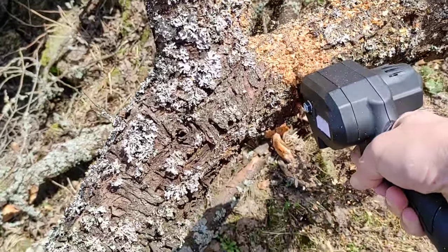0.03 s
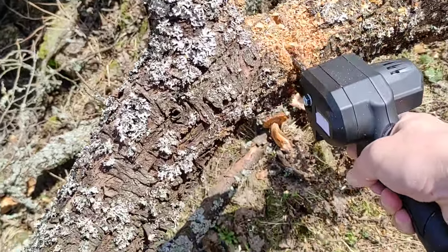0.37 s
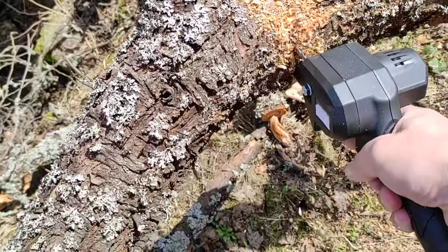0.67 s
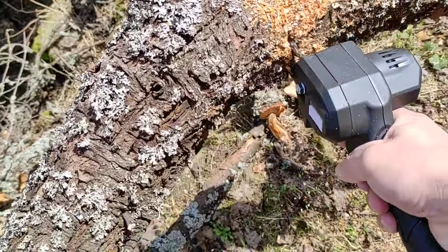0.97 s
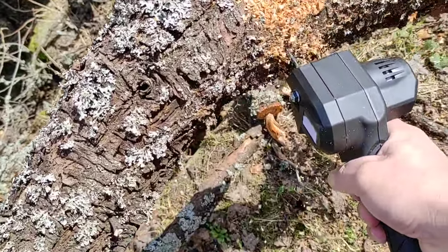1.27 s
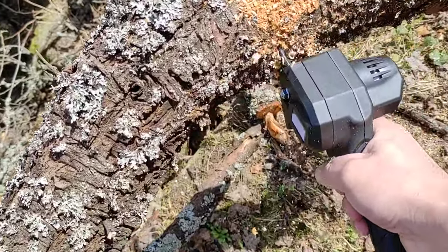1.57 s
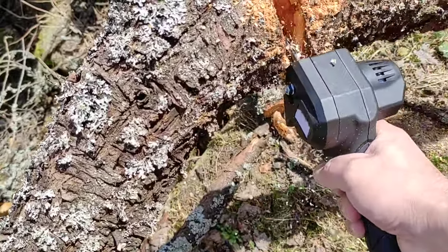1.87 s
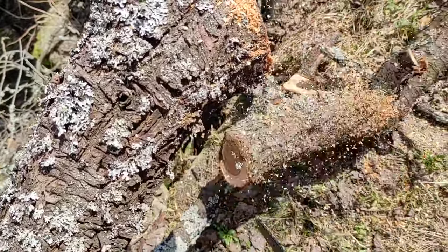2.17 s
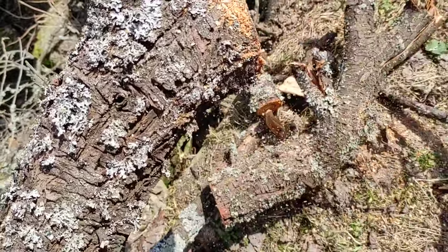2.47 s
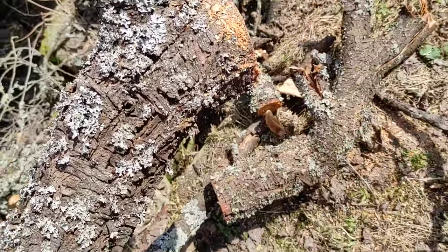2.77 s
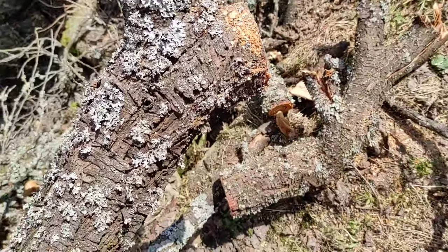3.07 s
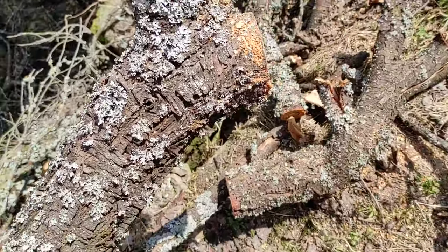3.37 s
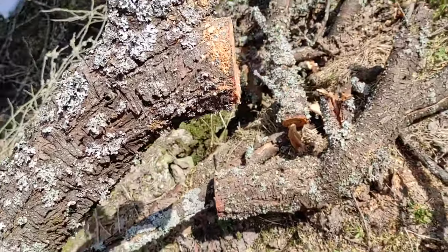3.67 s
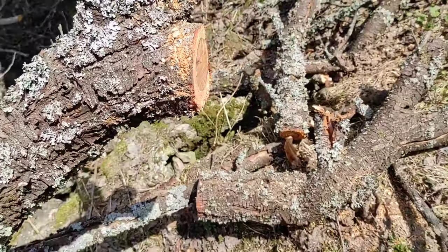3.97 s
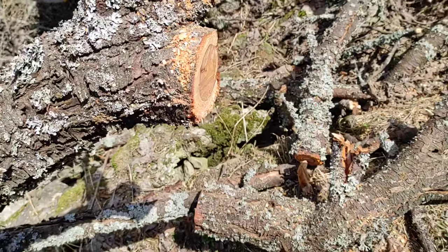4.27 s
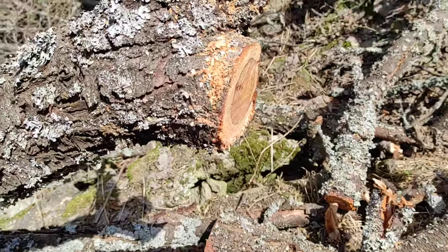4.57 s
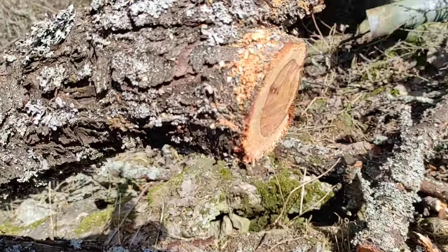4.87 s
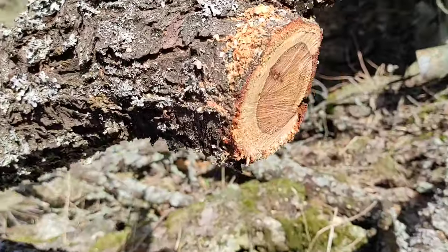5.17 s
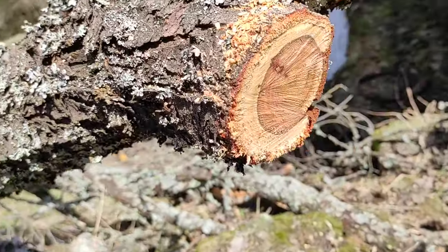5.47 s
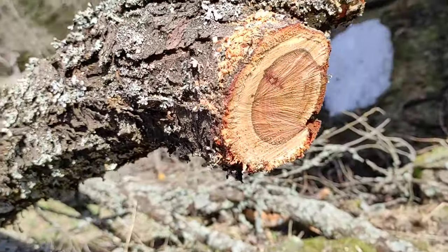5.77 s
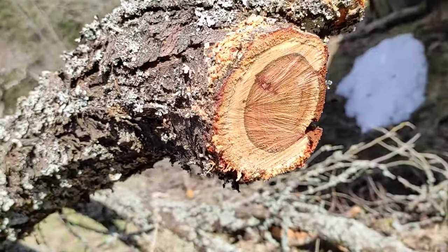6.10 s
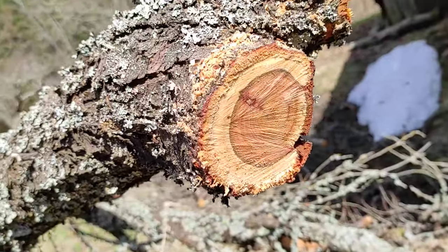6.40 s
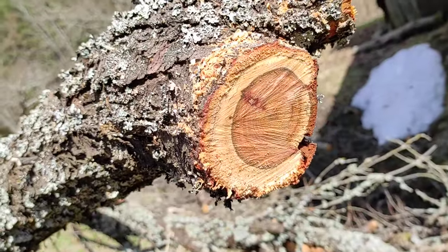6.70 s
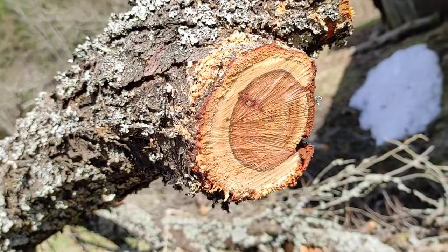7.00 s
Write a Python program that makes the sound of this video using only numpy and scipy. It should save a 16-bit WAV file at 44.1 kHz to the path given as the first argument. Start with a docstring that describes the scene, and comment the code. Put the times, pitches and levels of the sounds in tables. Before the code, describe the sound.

Close by outdoors, a small battery chainsaw rasps through a dry branch, its chain clattering and humming as the bar judders. After about two seconds it breaks through, races briefly and brakes to a stop. The branch lands with a dull thump. The rest is much quieter: feet shift in crackling dry grass, small twigs snap, and gusts of wind rumble and flutter on the microphone.

```python
"""Chainsaw through a dry branch

A small battery chainsaw rasps through dry wood outdoors: cutters tear fibres, links clatter and hum,
and the bar judders in the kerf. The chain races as it breaks free, then brakes to a stop.
The branch thumps into the litter; feet shift in crackling grass, twigs snap,
and gusts rumble and flutter on the microphone."""
import sys
import numpy as np
from scipy import signal
from scipy.fft import rfft, irfft, next_fast_len
from scipy.io import wavfile

SR = 44100
rng = np.random.default_rng(int(sys.argv[2]) if len(sys.argv) > 2 else 0)


def unload_wav(signal):
    """Save mono or channel-first audio to the path in sys.argv[1] as 16-bit WAV at rate SR, clipped to [-1, 1]."""
    wavfile.write(
        sys.argv[1],
        SR,
        np.round(np.clip(np.atleast_2d(signal).T, -1, 1) * 32767).astype(np.int16),
    )


N = 319284
T = np.arange(N) / SR

# chain speed in the wood: (time [s], speed [links/s])
CUTTING_SPEED = [(0, 322), (.3, 336), (.52, 334), (.72, 322), (.95, 316), (1.1, 333), (1.25, 338),
                 (1.35, 360), (1.55, 365), (1.88, 335)]
# effort of the cut: (time [s], clatter level [dB], motor load [0-1])
CUT_EFFORT = [(0, -18.5, 0.7), (.2, -19, 0.99), (.4, -21.5, 0.96), (.7, -18.5, 1), (.97, -21, 0.52),
              (1.15, -19.5, 0.4), (1.6, -18.5, 0.4), (2.0, -17.5, .7), (2.2, -19.5, 0.7),
              (2.275, -18, 0.74)]
# the bar bouncing in the kerf: (time [s], rate [bounces/s], depth [0-1])
BAR_JUDDER = [(0, 29, .6), (.3, 31, .55), (.55, 31, .55), (.7, 48, .45), (.85, 50, .6), (1.0, 41, .7),
              (1.15, 35, .7), (1.6, 34.6, .9), (1.95, 33, .6), (2.1, 35, .3)]
# cutters catching hard: (time [s], level [dB], pitch [Hz])
CUTTER_CATCHES = [(.06, -22, 820), (.1, -25.5, 810), (.139, -23, 795), (0.208, -23, 860),
                  (.241, -22.5, 870), (.264, -22.5, 840), (.394, -28.5, 956), (.479, -24, 840),
                  (.516, -21.5, 870), (.646, -20.5, 868), (.727, -19, 860), (.826, -21.5, 930),
                  (.886, -25, 926), (.908, -21, 956), (.954, -24.5, 980), (1.03, -22.5, 980),
                  (1.085, -27, 336), (1.159, -23, 885), (1.184, -23.5, 704), (1.239, -18.5, 960),
                  (1.306, -25.5, 1010), (1.362, -26.5, 354), (1.415, -22, 1080), (1.452, -24, 820),
                  (1.504, -24.5, 783), (1.558, -28.5, 1045), (1.619, -28.5, 770), (1.654, -21, 789),
                  (1.749, -18, 940), (1.769, -23, 830), (1.79, -22, 780), (1.861, -19.5, 1090),
                  (1.89, -23, 777), (1.894, -24, 450)]
# the wood singing around the kerf: (time [s], pitch [Hz], level [dB])
KERF_RESONANCE = [(0, 765, -35.5), (.07, 780, -28), (.16, 854, -32), (.26, 890, -33.5), (.38, 950, -48.5),
                  (.53, 837, -31), (.72, 785, -33), (.82, 885, -36.5), (.91, 924, -29.5), (1.05, 975, -36),
                  (1.15, 960, -45), (2.0, 870, -40)]
# the nearly severed branch shaking: (start [s], hold [s], level [dB])
BRANCH_SHAKES = [(1.697, .04, -36), (1.862, 0.051, -32.5)]
# modes of the branch and of the steel bar: (frequency [Hz], level [dB], t60 [s])
BRANCH_MODES = [(360, -7, 0.024), (553, -9, 0.012), (717, -6, 0.029), (854, -3, 0.031), (970, -1.5, 0.031),
                (1080, -3.5, 0.02), (1890, -13.5, 0.028)]
BAR_MODES = [(3780, -18, .014), (4150, -21, .03), (4590, -21, 0.014), (5040, -25, 0.025),
             (5830, -21, 0.018)]
# sprocket partials: (order [x link rate], free level [dB], loaded level [dB])
HUM_PARTIALS = [(.5, -26, -19.5), (1, -2, -10.5), (1.5, -25.5, -14), (2, 2, -9.5), (2.5, -27, -0.5),
                (3, -8.5, -2.5), (4, -3, -12), (5, -20, -18)]
# tone colours of the wood and the chain: (frequency [Hz], level [dB])
RASP_EQ = [(600, -32), (1000, -13), (1250, -7.5), (1610, -7), (1930, -0.5), (2280, -4), (2990, -6),
           (3780, -7), (4530, -10.5), (5000, -15), (5500, -8.5), (7150, -40), (12100, -120)]
CHEWING_EQ = [(150, -39.5), (250, -22), (328, -17), (388, -12.5), (557, -6.5), (843, -3.5), (1100, -4),
              (1500, -21), (2500, -32.5)]
SHUDDER_EQ = [(80, -18), (125, -11), (165, -1.5), (225, -7), (290, 2.5), (360, -4), (480, -1.5), (800, -33)]
CLATTER_EQ = [(2820, -40), (4600, -11.5), (5200, -14), (5860, -7), (6910, 3), (8180, 2.5), (9150, -3),
              (9640, -14), (9950, -14.5), (11000, -16.5), (15100, -22.5), (15800, -26.5)]
RACING_EQ = [(250, -29.5), (400, -12.5), (600, -8.5), (930, -2.5), (1300, -11.5), (1930, -3.5), (2800, -6),
             (4300, -9.5), (5500, -11), (7000, -35)]

# twigs breaking: (time [s], body [dB], crack [dB], knock pitch [Hz], crack pitch [Hz], pan [dB])
TWIG_SNAPS = [(2.361, -53, -33, 800, 7500, 2.5), (2.412, -37, -24, 2420, 7260, -3),
              (2.435, -47, -29, 2810, 7500, 3), (2.478, -49, -34, 2000, 7500, -7),
              (2.535, -46, -40, 826, 7400, -6), (2.94, -61, -49, 880, 7500, 4.5),
              (3.279, -51, -65, 520, 5940, 5), (3.331, -47, -66, 514, 6000, 2),
              (3.385, -46.5, -33.5, 2590, 7660, 5), (3.457, -47.5, -65, 565, 6000, 0),
              (3.524, -45, -60, 594, 6000, -1), (3.556, -44.5, -46, 1410, 4500, 3),
              (4.09, -58, -41, 760, 7700, 7), (4.227, -54, -41, 1900, 7500, 1),
              (4.309, -45, -50, 600, 7500, 2), (4.482, -43.5, -35, 2400, 8000, 7),
              (4.492, -48, -45, 520, 7500, 1), (4.535, -60, -41, 2200, 8200, 5),
              (4.549, -51, -30, 2080, 8850, 7), (4.568, -36, -29, 600, 7500, -1),
              (4.599, -43, -34, 2100, 8000, 6), (4.613, -45, -32, 2010, 6800, 3),
              (4.665, -33, -39, 980, 4500, -1), (4.683, -48, -34, 2000, 8000, 5),
              (4.715, -48, -32, 2200, 6000, 5), (4.728, -45, -34, 2400, 8000, 7),
              (4.746, -49, -33, 2200, 6800, 9), (4.77, -39.5, -36, 2200, 6500, 8),
              (4.788, -46, -36, 2760, 8000, 8), (4.835, -45, -28, 2200, 5240, 9),
              (4.906, -50, -30.5, 1790, 6400, 6), (5.072, -47, -36, 1300, 6300, 3),
              (5.171, -50, -53, 1220, 6000, 1), (5.299, -45.5, -56, 1090, 6000, 4),
              (5.405, -49, -56, 1000, 6000, 2), (5.474, -47, -50, 2400, 7500, 2),
              (5.481, -53, -47, 2000, 7500, 1.5), (5.512, -59, -38.5, 940, 7500, -3),
              (5.653, -51, -54, 1170, 6000, 4), (5.965, -41.5, -53, 1690, 5960, 1),
              (6.124, -48, -46.5, 1400, 7460, 4), (6.153, -35.5, -42, 1140, 4500, -1),
              (6.159, -58, -40.5, 790, 6960, -14), (6.181, -47, -55, 850, 5970, 2),
              (6.459, -57, -56, 980, 6000, -2.5), (6.503, -57.5, -63, 1500, 4500, 2)]
# weight on the litter, first the branch, then feet:
# (start [s], hold [s], release [s], swish [dB], crunch [dB], pan [dB])
LITTER_PRESSES = [(2.339, 0.015, 0.026, -38, -50.5, -1.5), (2.4, 0.047, 0.085, -40.5, -50.5, -1.5),
                  (3.347, 0.04, 0.012, -52.5, -55.5, 3), (3.56, 0.068, 0.015, -54.5, -60.5, 6),
                  (3.93, 0.072, 0.032, -52.5, -55, 1.5), (4.283, .17, 0.032, -50, -57.5, 0),
                  (4.44, 0.21, 0.044, -47.5, -52.5, 2.5), (4.68, 0.077, 0.014, -44, -52, 1.5)]
# branch and feet landing: (time [s], level [dB], decay [s])
SOIL_THUMPS = [(2.233, -37, 0.033), (2.275, -33, 0.033), (2.421, -44, 0.027), (6.141, -43.5, 0.016)]
# dry grass stirring throughout: (time [s], level [dB])
GRASS_RUSTLE = [(2.3, -52), (2.8, -63), (3.0, -67.5), (3.2, -66.5), (3.3, -57.5), (4.25, -56.5),
                (4.95, -52), (5.9, -56.5), (6.05, -63.5), (6.7, -74.5), (7.24, -82)]
# tone colours of twigs, grass and soil: (frequency [Hz], level [dB])
TWIG_BODY_EQ = [(150, -17.5), (400, 1), (800, -0.5), (1300, -3.5), (2500, 0.5), (4500, -13.5),
                (9000, -19.5)]
TWIG_CRACK_EQ = [(1200, 14.5), (3000, -5), (5200, -4), (7000, 6), (8700, 3.5), (10000, -12.5), (15800, -10)]
CRUNCH_EQ = [(180, -40.5), (300, 5), (437, -3.5), (579, -1.5), (1060, -0.5), (1420, -1), (2750, -2.5),
             (3910, -6.5), (5500, -25.5), (7150, -64.5), (12100, -120)]
SWISH_EQ = [(2650, -36.5), (4500, -12.5), (4840, -16), (5980, -6), (8410, -1.5), (8910, -5.5),
            (10400, -21.5), (14700, -23.5), (15800, -28)]
SCUFF_EQ = [(250, -17), (480, 7), (750, 6), (1100, -3.5), (1600, -22.5)]
THUMP_EQ = [(30, -22.5), (70, -9.5), (130, -3), (190, -0.5), (300, -7.5), (700, -36.5)]

# single eddies slapping the microphone: (time [s], level [dB], pitch [Hz], pan [dB])
EDDY_SLAPS = [(3.688, -24, 51.1, -28.5), (3.719, -27.5, 161, -30.5), (3.759, -32, 105, -15.0),
              (3.819, -30, 51.1, 2.5), (3.85, -33, 64, 10.5), (3.889, -23, 61.9, 10),
              (3.939, -21, 72.7, 13.0), (4.009, -29, 70.4, 11), (4.139, -22.5, 59.6, 17),
              (4.188, -27, 56.5, 14), (4.439, -31.5, 84, -5.5), (6.291, -32.5, 91.5, -19),
              (6.334, -36.5, 173, -10), (6.456, -29.5, 86.5, -25), (6.579, -39, 51.1, -19.0),
              (6.626, -40.5, 53.8, -6.5)]
# gusts on the microphone: (start [s], hold [s], rumble [dB], flutter [dB], pan [dB])
WIND_GUSTS = [(2.418, .03, -49, -64, 2), (2.746, 0.034, -47, -68, -14), (2.805, 0.04, -46, -65, -19.5),
              (3.019, .04, -53.5, -78, -6), (3.131, 0.025, -50.5, -75.5, -15.5),
              (3.355, 0.045, -46, -59.5, -2.5), (3.423, 0.052, -45, -62, -21),
              (3.67, 0.021, -34.5, -28, -23), (3.721, 0.066, -42, -39.5, -18), (3.804, 0.14, -34.5, -39, 4),
              (3.908, 0.063, -33, -39.5, 7.5), (3.991, 0.12, -36, -45, 4.5), (4.116, .02, -34.5, -35, 8),
              (4.174, .025, -34.5, -37, 8.5), (4.243, 0.24, -37, -46.5, 5), (4.414, 0.053, -39, -56, -5),
              (4.983, 0.045, -47, -53, -8.5), (5.163, .06, -41, -58, 21), (5.367, 0.049, -46, -49, -22),
              (5.518, 0.033, -41, -55, -24.5), (5.607, 0.02, -51.5, -70, 8.5),
              (5.918, 0.03, -40.5, -58.5, 16.5), (6.127, 0.023, -45.5, -44.5, -28.5),
              (6.283, 0.016, -46.5, -49, -17.5), (6.349, .06, -44, -62, 1.5),
              (6.414, .04, -47.5, -45, -25.5), (6.54, 0.061, -42, -48.5, -23), (6.653, .03, -51, -62, 1),
              (6.762, .02, -49, -60.5, -16.5), (6.941, .03, -48, -64, -20)]
# the breeze under the gusts: (time [s], rumble [dB], pan [dB])
BREEZE_BED = [(2.4, -54, 2), (2.65, -62, 7), (3.3, -54.5, -3), (4.6, -46, 1.5), (5.1, -54, -2),
              (5.8, -55, 0.5), (7.24, -56, -5.5)]
# tone colours of the wind: (frequency [Hz], level [dB])
RUMBLE_EQ = [(10, 0.5), (25, 1.5), (40, 0), (75, -4), (120, -16), (250, -36.5)]
FLUTTER_EQ = [(50, -21.5), (100, -4), (160, 1.5), (240, -3.5), (330, -17), (500, -26.5), (1000, -48)]

# how alike the two channels are: (frequency [Hz], likeness [correlation once clipped to +-0.95])
STEREO_LIKENESS = [(60, 3.5), (130, 0), (290, 4.5), (700, 0.4), (1400, 0.92), (2500, 0.14), (5000, 0.28),
                   (8000, -0.14), (15000, 0)]
# stereo placement of saw and ground: (frequency [Hz], pan [dB, left over right])
SAW_PAN = [(100, 12), (350, 5.5), (850, 5), (1300, -1), (1950, 3.5), (2800, -2), (5800, -0.5), (7000, -5),
           (7600, -1.5), (8400, 8), (9600, -1.5), (10800, 2), (13000, -13), (15500, -1)]
GROUND_PAN = [(300, 5.5), (2200, 1), (3800, -1), (6800, -5.5), (8500, 8), (9700, 7.5), (11500, 1.5),
              (14000, -5.5)]

THROUGH_AT_S, BRAKE_AT_S = 2.015, 2.21   # the bar breaks through; the trigger is let go


def chainsaw():
    """Every second link carries a cutter that tears the wood while the bar judders in the kerf."""
    links_per_s, in_wood, braking = motor()
    clatter_db, load = in_time(CUT_EFFORT)
    bounces_per_s, depth = in_time(BAR_JUDDER)
    wobble = (.0035 + .014 * in_wood) * drift(25)   # the wood's drag unsteadies the chain
    links = np.cumsum(links_per_s * (1 + wobble)) / SR
    cutters = bites(links / 2, sharpness=.25, uneven_db=-1.5)
    seating = bites(links, sharpness=.1, uneven_db=.26)
    cutting = cutters * seating
    # each bounce presses the chain into the wood, some deeper than others
    bounces = np.maximum.accumulate(np.cumsum(bounces_per_s) / SR + .06 * drift(15))
    press = depth * np.cos(2 * np.pi * bounces - .6)
    bite_db = 1.4 * depth * np.clip(rng.standard_normal(N), -1.5, 1.5)[(bounces + .5).astype(int)]
    tearing = rms_one(cutting * from_db(4.1 * press + bite_db))
    wood = fibre_rasp(cutting * np.sqrt(in_wood), clatter_db, swing_db=.7 * press + bite_db / 2)
    wood += chewing(tearing * np.sqrt(in_wood))
    wood += bounce_knocks(bounces, depth * in_wood) + cutter_catches()
    wood += in_wood * kerf_whine(tearing)
    chain = np.sqrt(1 - in_wood)   # the part that runs clear of the wood
    steel = racing_chain(chain * seating) + from_db(clatter_db) * chain_clatter(links, press)
    wood += branch_shudder(tearing, in_wood)
    rumble = from_db(-46.5) * coloured(noise(), RUMBLE_EQ)
    loudness = braking ** 3.97
    hum = loudness ** .3 * sprocket_hum(links, links_per_s, load, in_wood)   # dies before the clatter
    return loudness * (wood + steel + hum + rumble)


def motor(free_links_per_s=480, spin_up_s=.045, leave_wood_s=.11, brake_s=.17):
    """The freed motor spins up, then brakes: links per second, share in the wood, braking factor."""
    loaded, = in_time(CUTTING_SPEED)
    since_through = np.maximum(T - THROUGH_AT_S, 0)
    running = free_links_per_s + (loaded - free_links_per_s) * np.exp(-since_through / spin_up_s)
    in_wood = np.clip(1 - since_through / leave_wood_s, 0, 1)
    braking = 1 - np.clip((T - BRAKE_AT_S) / brake_s, 0, 1) ** 2.5
    return running * braking, in_wood, braking


def fibre_rasp(cutting, clatter_db, swing_db, follow=.3):
    """Fibres tear in a gritty rasp that partly follows the level of the clatter."""
    rasp_db = -25 + follow * (clatter_db - clatter_db[T < THROUGH_AT_S].mean())
    fibres = from_db(rasp_db + swing_db) * cutting * grains(7000, spread_db=.9, smooth=.89)
    return coloured(fibres, RASP_EQ, SAW_PAN)


def chewing(tearing):
    """Chips, and splinters after each catch, sound the body of the branch."""
    chips = from_db(-30) * tearing * grains(2500, spread_db=1.1, smooth=.8)
    splinters = sum(from_db(db - 8) * burst(s, decay_s=.012) for s, db, _ in CUTTER_CATCHES)
    return coloured(chips + splinters, CHEWING_EQ, SAW_PAN)


def bounce_knocks(bounces, strength, level_db=-45.5):
    """Every bounce of the bar strikes the modes of the branch."""
    landed = np.diff(bounces.astype(int), prepend=0) * strength
    out = np.zeros((2, N))
    for k, (hz, db, t60) in enumerate(BRANCH_MODES):
        blows = landed * from_db(3 * np.clip(noise(N), -2, 1.5)) * (-1) ** k
        out += from_db(level_db + db) * ring(blows, hz, t60) * panned(at_hz(SAW_PAN, hz))
    return out


def cutter_catches():
    """A cutter digs in and tears loose: a short, pitched knock of the wood."""
    grip = pulse(SR // 16, rise_s=.003)
    grip_rms = np.sqrt(np.mean(grip ** 2))
    out = np.zeros((2, N))
    for s, db, hz in CUTTER_CATCHES:
        knock = grip_rms * rms_one(resonate(grip * noise(len(grip)), hz, q=4.5))
        add_at(out, s, from_db(db) * knock * panned(at_hz(SAW_PAN, hz)))
    return out


def kerf_whine(tearing, width_hz=40, wobble=.018):
    """A narrow resonance of the wood wanders as the cut deepens."""
    hz, db = in_time(KERF_RESONANCE)
    force = tearing * noise(N)
    carrier = np.exp(2j * np.pi * np.cumsum(hz * (1 + wobble * drift(20))) / SR)
    # shift down, low-pass, shift back: a band-pass that glides
    ringing = signal.lfilter([1], [1, -np.exp(-np.pi * width_hz / SR)], force / carrier)
    return from_db(db) * rms_one((ringing * carrier).real) * panned(at_hz(SAW_PAN, hz))


def branch_shudder(tearing, in_wood):
    """The branch shudders under the cutters and shakes harder when nearly severed."""
    shakes = [from_db(db) * swell(s, .025, hold_s, release_s=.031) for s, hold_s, db in BRANCH_SHAKES]
    shudder = coloured(tearing * grains(900, spread_db=-1, smooth=.43), SHUDDER_EQ, SAW_PAN)
    return together([from_db(-40.5) * in_wood, *shakes]) * shudder


def racing_chain(seating):
    """Clear of the wood, the sliding chain hisses in time with its links."""
    sliding = from_db(-24.5) * seating * grains(6000, spread_db=3.5, smooth=.98)
    return coloured(sliding, RACING_EQ, SAW_PAN)


def chain_clatter(links, press):
    """Links rattle brightly along the steel bar and set it ringing."""
    impacts = bites(links, sharpness=.092, uneven_db=1.12)
    rattle = rms_one(impacts * from_db(1.1 * press + .7 * drift(18)))
    contacts = rattle * grains(7000, spread_db=.5, smooth=2.3)
    bar = sum(from_db(db) * ring(rattle * noise(), hz, t60) for hz, db, t60 in BAR_MODES)
    return coloured(contacts, CLATTER_EQ, SAW_PAN) + bar


def sprocket_hum(links, links_per_s, load, in_wood, rough_turns=.03):
    """Links seat unevenly on the sprocket: a rough hum, wavering and rich in half orders under load."""
    hum_db = -33 - 3 * in_wood
    load = load * in_wood
    hum = np.zeros((2, N))
    for order, free_db, loaded_db in HUM_PARTIALS:
        waver_db = (.8 + 1.2 * load) * drift(12) + (.8 + .8 * in_wood) * drift(90)
        level_db = hum_db + free_db + load * (loaded_db - free_db) + waver_db
        turns = order * links + rng.random()
        roughness = rough_turns * (1 + in_wood) / 2 * np.sqrt(order) * drift(57)
        tone = np.sqrt(2) * np.sin(2 * np.pi * (turns + roughness))
        hum += from_db(level_db) * tone * panned(at_hz(SAW_PAN, order * links_per_s))
    return hum


def log_reflection(saw, delay_s=.0015, wander=.025, share=.3):
    """The log throws the treble back, combing the saw; the path shifts with the hand."""
    treble = signal.lfilter(*signal.butter(1, 2500, "high", fs=SR), saw)
    echo = [np.interp(T - delay_s * (1 + wander * drift(1.5)), T, side) for side in treble]
    return saw + share * np.array(echo)


def twig_snaps(break_force=11):
    """Each twig breaks with a sharp crack and a short woody knock; thick ones sound dull."""
    body, crack, pan = np.zeros((2, N)), np.zeros((2, N)), np.zeros(N)
    age = T[:SR // 16]
    for s, body_db, crack_db, knock_hz, crack_hz, pan_db in TWIG_SNAPS:
        splinters = noise((2, len(age))) * np.exp(-age / .005)
        split = noise((2, len(age))) * np.exp(-age / .0022)
        splinters[0, 0] += break_force   # the break itself is a single spike
        split[0, 0] += break_force
        dulled = signal.lfilter(*signal.butter(1, 2.8 * knock_hz, fs=SR), splinters)
        knock = resonate(dulled, knock_hz, q=1.4)
        add_at(body, s, from_db(body_db) * (.24 * dulled + 1.27 * knock))
        add_at(crack, s, from_db(crack_db) * resonate(split, crack_hz, q=2.2))
        pan[int(s * SR):] = pan_db
    snaps = coloured(body, TWIG_BODY_EQ, GROUND_PAN) + coloured(crack, TWIG_CRACK_EQ, GROUND_PAN)
    return snaps * panned(pan)


def dry_grass(attack_s=.019, breaking_db=-46, stalk_share=.55):
    """Stalks crackle under shifting weight, small twigs tick, and a sole scuffs the soil."""
    rustle_db, = in_time(GRASS_RUSTLE)
    stirring = from_db(rustle_db) * panned(1.8)
    air_high, air_mid = from_db(-77), from_db(-70.5)   # faint steady hiss of the open air
    swishes, crunches = [stirring, air_high], [stirring * from_db(-5), air_mid]
    pressed = 0
    for s, hold_s, release_s, swish_db, crunch_db, pan_db in LITTER_PRESSES:
        weight = swell(s, attack_s, hold_s, release_s)
        swishes.append(from_db(swish_db) * weight * panned(pan_db))
        crunches.append(from_db(crunch_db) * weight * panned(pan_db))
        pressed = np.maximum(pressed, weight * min(1, from_db(swish_db - breaking_db) ** 2))
    # heavy steps break stalks and crush in clumps; light ones mostly bend them
    clumps = from_db((.8 + 1.1 * pressed) * drift(70) + 1.1 * drift(9))
    breaking = np.sqrt(stalk_share * pressed) * grains(200, spread_db=2.6, smooth=0)
    bending = np.sqrt(1 - stalk_share * pressed) * clumps
    crunch = coloured(breaking + bending * grains(500, spread_db=2, smooth=1.7), CRUNCH_EQ, GROUND_PAN)
    swish = coloured(breaking + bending * grains(800, spread_db=-.5, smooth=2.3), SWISH_EQ, GROUND_PAN)
    scuff = coloured(grains(400, spread_db=8.5, smooth=.76), SCUFF_EQ, GROUND_PAN)
    ticks = coloured(grains(45, spread_db=2.5, smooth=0), TWIG_BODY_EQ, GROUND_PAN)
    sole = from_db(-55) * swell(4.28, attack_s, hold_s=.12, release_s=.17)
    soil = together([sole, stirring * from_db(-23.5)]) * scuff
    grass = together(crunches) * crunch + together(swishes) * swish
    return grass + soil + from_db(-16) * stirring * ticks


def thumps():
    """Weight lands dully on soft soil."""
    landings = sum(from_db(db) * burst(s, decay_s) for s, db, decay_s in SOIL_THUMPS)
    return coloured(landings, THUMP_EQ, GROUND_PAN)


def buffets(trim_db=-.5):
    """An eddy slaps the microphone: one short, dull swing of pressure."""
    push = pulse(SR // 8, rise_s=.0041)
    out = np.zeros((2, N))
    for s, db, hz, pan_db in EDDY_SLAPS:
        swing = resonate(push * noise(len(push)), hz, q=.98)
        swing = signal.sosfilt(signal.butter(4, 2 * hz, fs=SR, output="sos"), swing)
        add_at(out, s, from_db(db + trim_db) * swing / np.abs(swing).max() * panned(pan_db))
    return out


def wind(eddy_db=4):
    """Gusts ride on a light breeze; their eddies rumble and flutter on each microphone separately."""
    breeze_db, breeze_pan_db = in_time(BREEZE_BED)
    breeze = from_db(breeze_db) * panned(breeze_pan_db)
    rumble_power, flutter_power = breeze ** 2, (breeze * from_db(-11)) ** 2
    for s, hold_s, rumble_db, flutter_db, pan_db in WIND_GUSTS:
        gust = swell(s, .016, hold_s, release_s=.026) * panned(pan_db)
        rumble_power += (from_db(rumble_db) * gust) ** 2
        flutter_power += (from_db(flutter_db) * gust) ** 2
    eddies = rms_one(from_db(eddy_db * np.array([drift(30), drift(30)])))
    rumble = coloured(eddies * noise() * np.sqrt(rumble_power), RUMBLE_EQ)
    flutter = coloured(eddies * noise() * np.sqrt(flutter_power), FLUTTER_EQ)
    return rumble + flutter


def coloured(force, eq, pan=None):
    """Two forces ring a body: as mid and side when given a pan curve, otherwise as left and right."""
    size = next_fast_len(N + 8192)
    size += size % 2
    hz = np.arange(size // 2 + 1) * SR / size
    octaves_outside = np.maximum(np.log2(eq[0][0] / (hz + 1)), np.log2((hz + 1) / eq[-1][0]))
    gain = from_db(at_hz(eq, hz) - 36 * np.clip(octaves_outside, 0, 2))
    alike = np.clip(at_hz(STEREO_LIKENESS, hz), -.95, .95) if pan else 0
    gain = gain / np.sqrt(np.mean(gain ** 2 * (1 + alike)))
    gain = gain * panned(at_hz(pan, hz) if pan else 0 * hz)
    # minimum phase: the body rings only after it is struck
    fold = np.r_[1, np.full(size // 2 - 1, 2), 1, np.zeros(size // 2 - 1)]
    response = np.exp(rfft(irfft(np.log(gain)) * fold))
    drive = rfft(force, size)
    if pan:
        mid, side = drive
        drive = np.sqrt(1 + alike) * mid + np.sqrt(1 - alike) * side * [[1], [-1]]
    return irfft(response * drive)[:, :N]


def grains(per_s, spread_db, smooth):
    """Tiny fractures of uneven size over a share of smooth hiss."""
    fractures = rng.random(N) < per_s / SR
    sizes = from_db(spread_db * np.minimum(rng.exponential(1, N), 4))
    clicks = rms_one(fractures * sizes * noise())
    return rms_one(clicks + smooth * noise())


def bites(turns, sharpness, uneven_db):
    """Once a turn the force jumps to a new strength and sags."""
    count = turns.astype(int)
    strength = from_db(uneven_db * np.clip(noise(4000), -2, 2))
    force = strength[count] * np.exp(-sharpness * (turns - count))
    moving = turns < turns[-1]
    return np.where(moving, force / np.sqrt(np.mean(force[moving] ** 2)), 1)


def burst(start_s, decay_s):
    """A sudden noisy force that dies away."""
    age = T[:SR // 4]
    force = np.zeros((2, N))
    add_at(force, start_s, noise((2, len(age))) * np.exp(-age / decay_s))
    return force


def ring(force, hz, t60):
    """One ringing mode, at unit power."""
    radius, angle = from_db(-60 / (t60 * SR)), 2 * np.pi * hz / SR
    feedback = [1, -2 * radius * np.cos(angle), radius ** 2]
    return rms_one(signal.lfilter([1, 0, -1], feedback, force + 1e-18))


def resonate(force, hz, q):
    """A band-pass that gives a force its pitch."""
    return signal.lfilter(*signal.iirpeak(hz, q, fs=SR), force)


def pulse(samples, rise_s):
    """A quick push that peaks at rise_s."""
    age = T[:samples] / rise_s
    return age * np.exp(1 - age)


def swell(start_s, attack_s, hold_s, release_s):
    """Rise, hold and die away."""
    age = T - start_s
    return np.clip(age / attack_s, 0, 1) * np.exp(-np.clip((age - attack_s - hold_s) / release_s, 0, 20))


def drift(hz):
    """Smooth random wander of unit spread."""
    pole = np.exp(-40 * np.pi * hz / SR)   # runs at a twentieth of the sample rate
    slow = signal.lfilter([1], [1, -2 * pole, pole ** 2], noise(N // 20 + 4002))[4000:]
    return np.interp(np.arange(N) / 20, np.arange(len(slow)), rms_one(slow))


def noise(shape=(2, N)):
    """White noise, stereo by default."""
    return rng.standard_normal(shape)


def add_at(track, start_s, sound):
    """Mix a short sound into a stereo track."""
    start = int(start_s * SR)
    track[:, start:start + sound.shape[-1]] += sound


def panned(pan_db):
    """Left and right gains of constant power; positive is left."""
    gains = from_db(np.array([pan_db, -pan_db]).reshape(2, -1) / 2)
    return gains / np.sqrt(np.mean(gains ** 2, axis=0))


def in_time(rows):
    """Each column of a curve at every sample."""
    times, *columns = np.transpose(rows)
    return [np.interp(T, times, column) for column in columns]


def at_hz(points, hz):
    """Read a curve on a log-frequency axis."""
    freqs, values = np.transpose(points)
    return np.interp(np.log(hz + 1), np.log(freqs), values)


def together(gains):
    """Unrelated sounds add in power."""
    return np.sqrt(sum(gain ** 2 for gain in gains))


def rms_one(x):
    """Scale to unit power."""
    return x / np.sqrt(np.mean(x ** 2) + 1e-20)


def from_db(db):
    """Decibels to gain."""
    return 10 ** (np.asarray(db) / 20)


def scene():
    """Everything is close by, in open air; the ground reaches the left microphone first."""
    left, right = dry_grass() + twig_snaps() + thumps()
    ground = np.array([left, np.interp(T - .00022, T, right)])
    return log_reflection(chainsaw()) + ground + wind() + buffets()


def record(dry):
    """Soft clipping rounds the peaks; a steep low-pass trims the very top."""
    rounded = dry / (1 + (dry / .9) ** 4) ** .25
    return signal.sosfilt(signal.ellip(12, .1, 80, 15850, fs=SR, output="sos"), rounded)


dry = scene()
out = record(dry)
unload_wav(out)
```